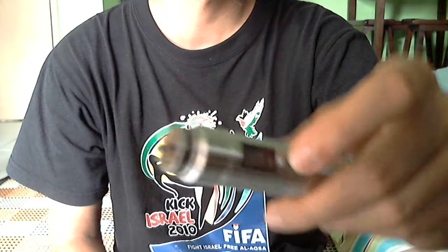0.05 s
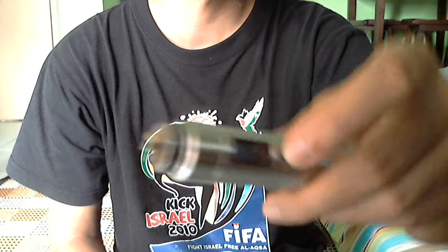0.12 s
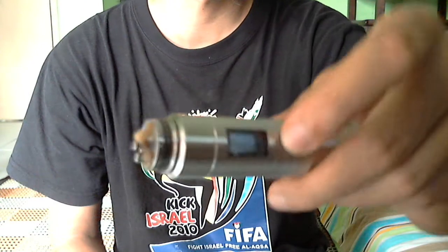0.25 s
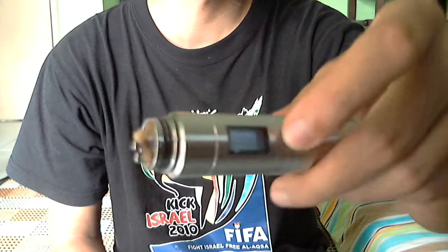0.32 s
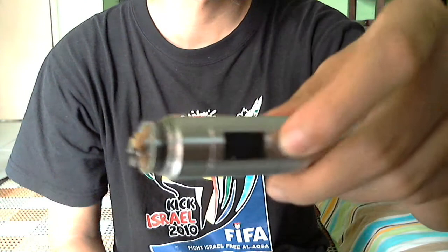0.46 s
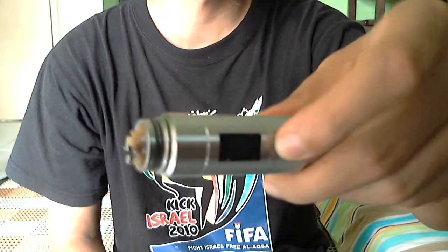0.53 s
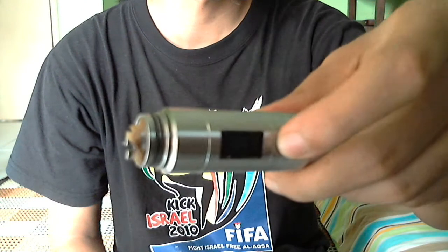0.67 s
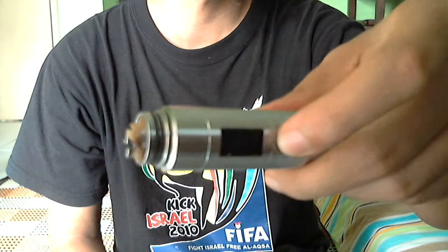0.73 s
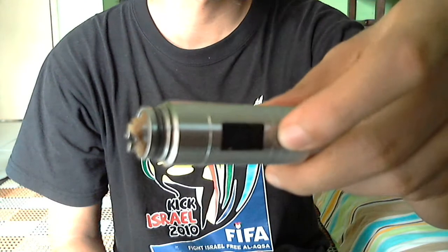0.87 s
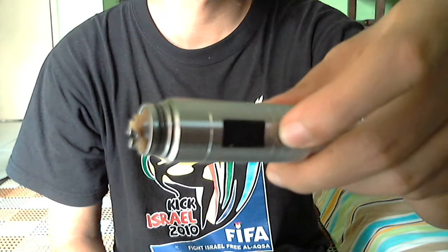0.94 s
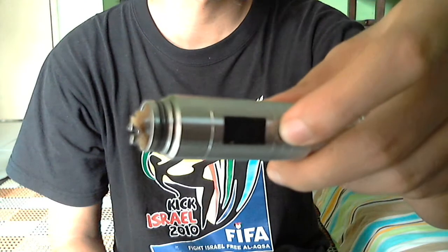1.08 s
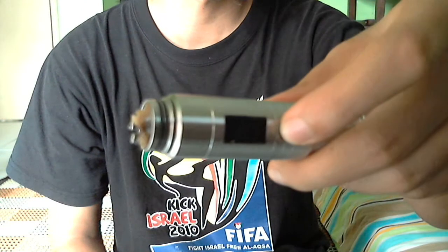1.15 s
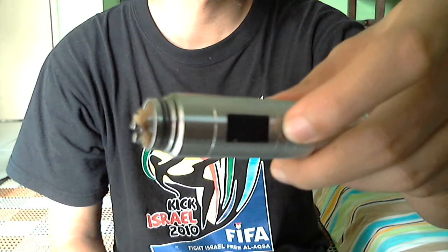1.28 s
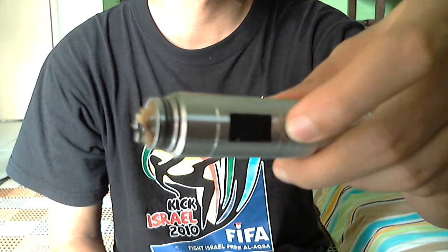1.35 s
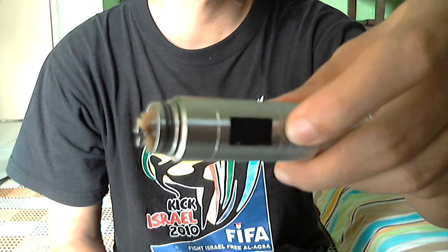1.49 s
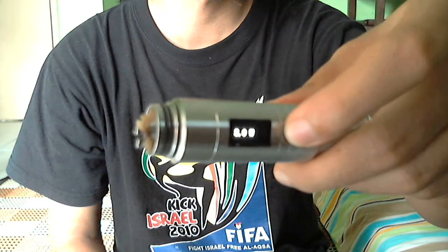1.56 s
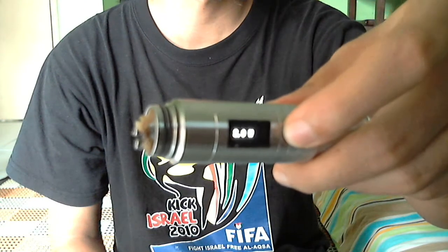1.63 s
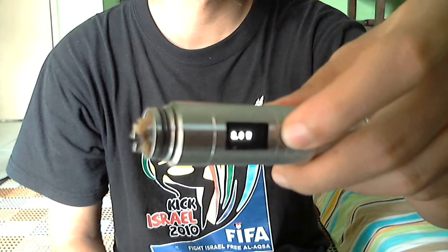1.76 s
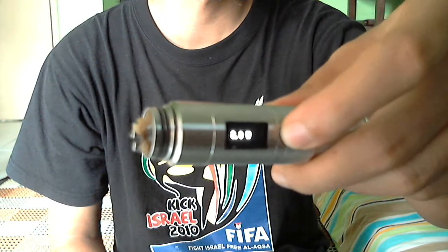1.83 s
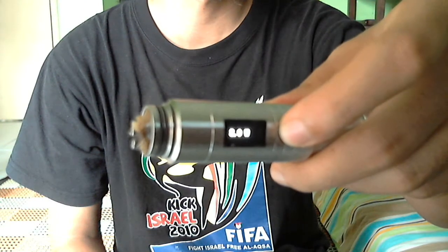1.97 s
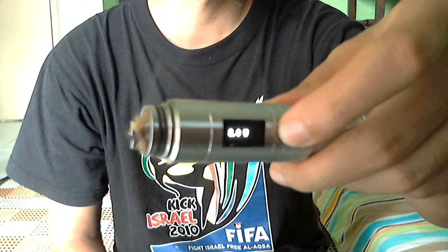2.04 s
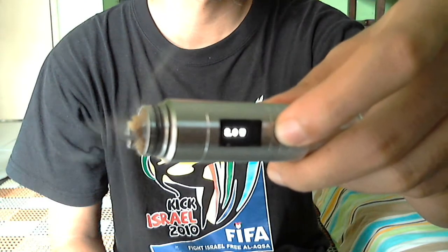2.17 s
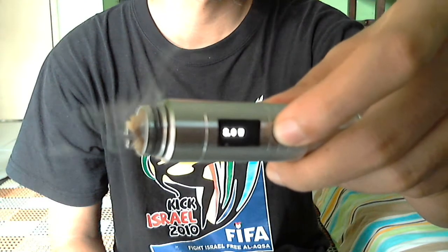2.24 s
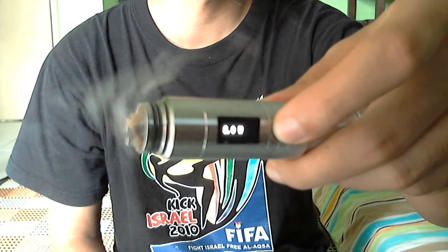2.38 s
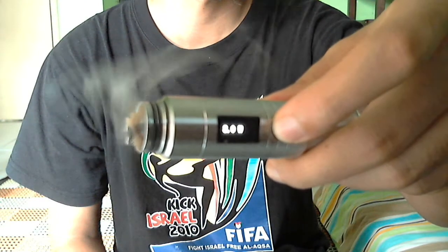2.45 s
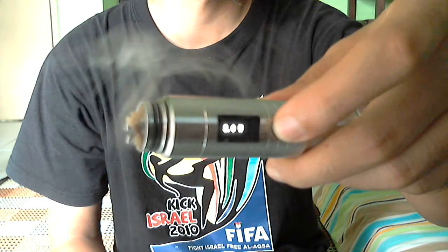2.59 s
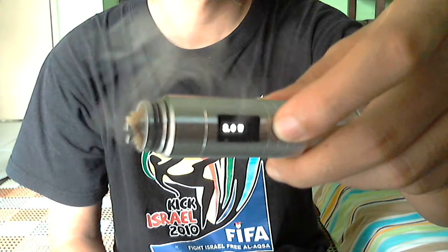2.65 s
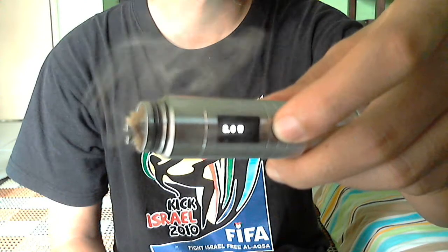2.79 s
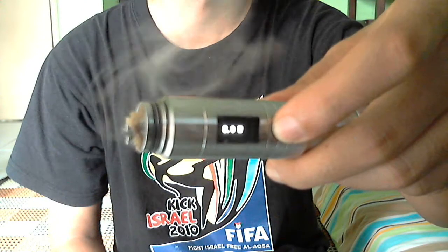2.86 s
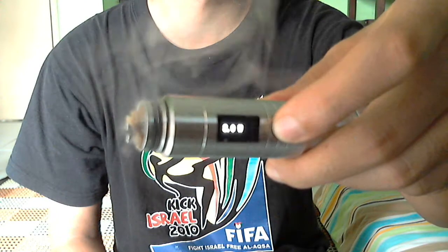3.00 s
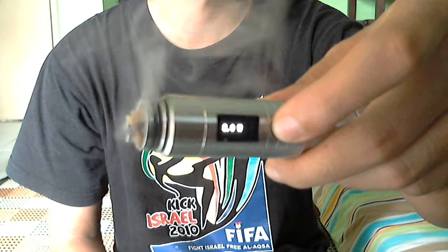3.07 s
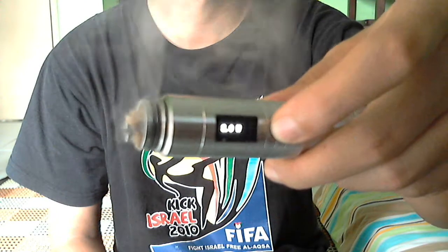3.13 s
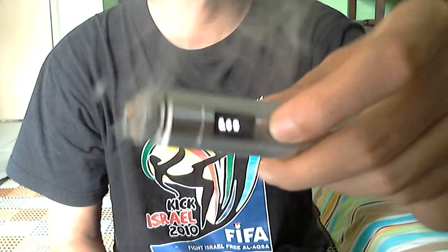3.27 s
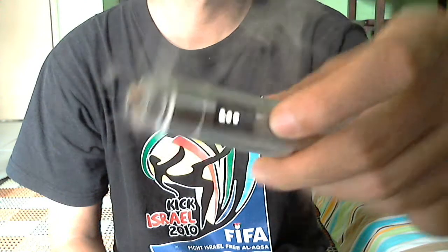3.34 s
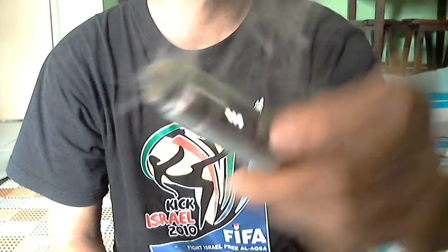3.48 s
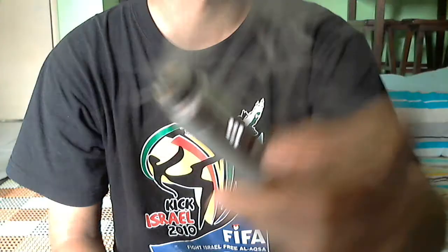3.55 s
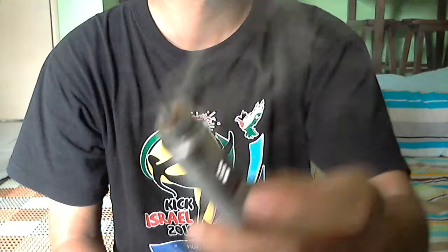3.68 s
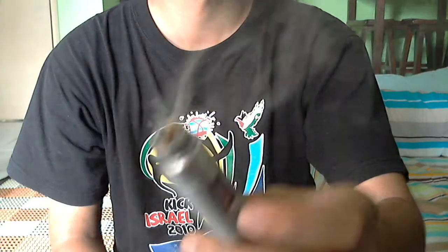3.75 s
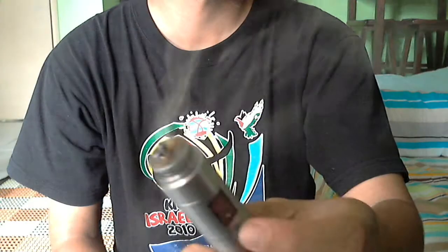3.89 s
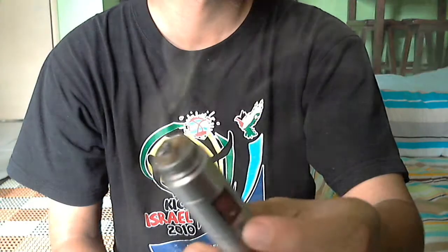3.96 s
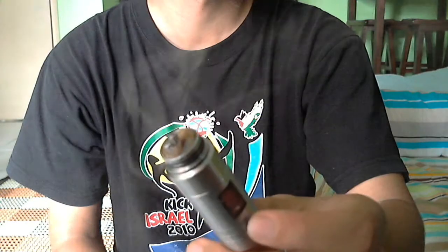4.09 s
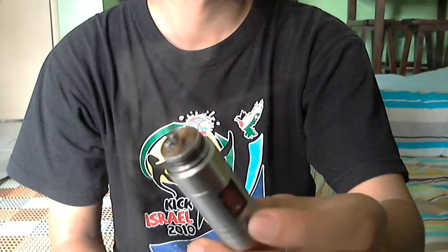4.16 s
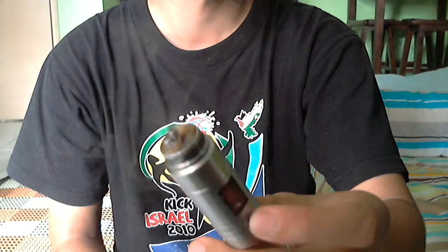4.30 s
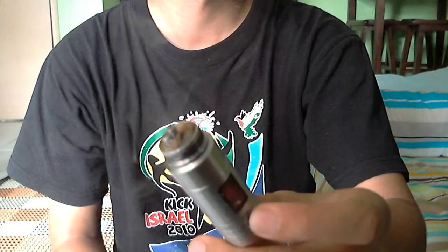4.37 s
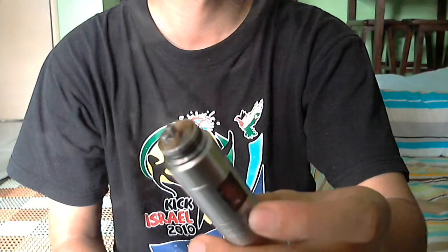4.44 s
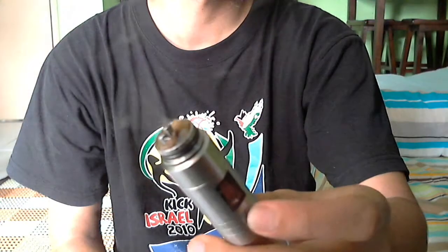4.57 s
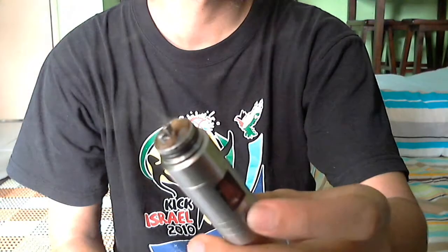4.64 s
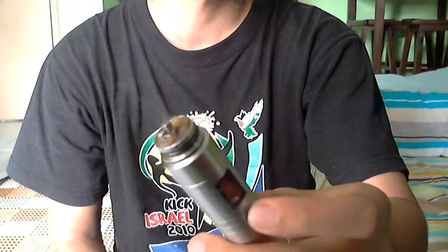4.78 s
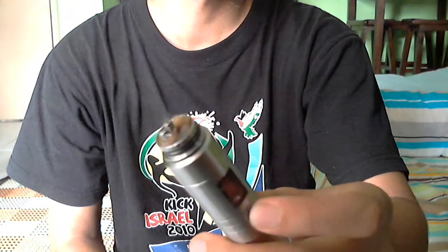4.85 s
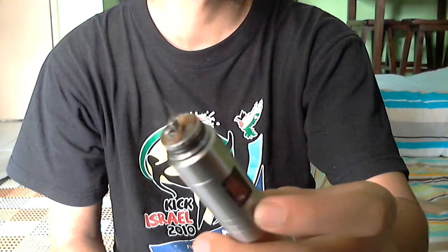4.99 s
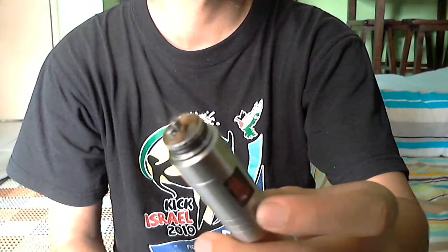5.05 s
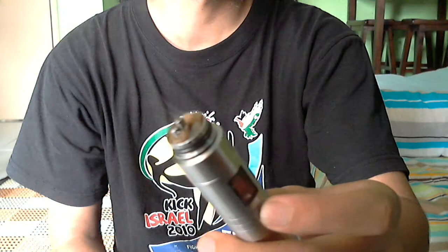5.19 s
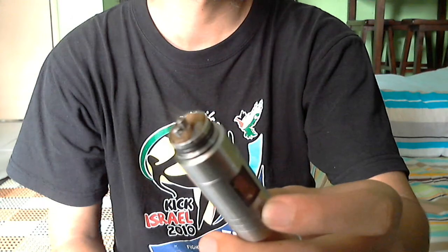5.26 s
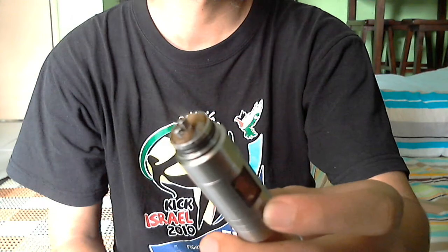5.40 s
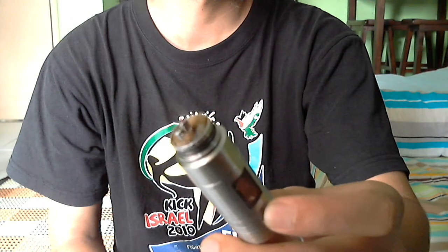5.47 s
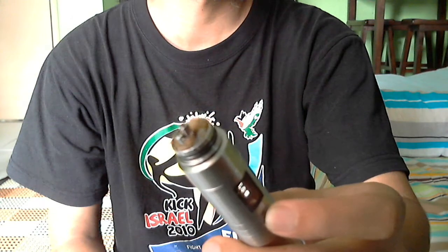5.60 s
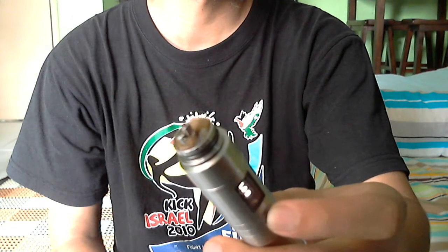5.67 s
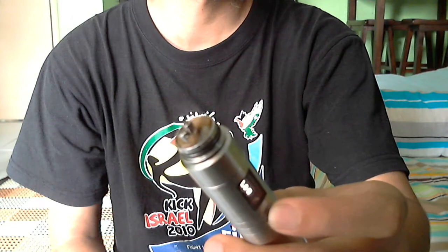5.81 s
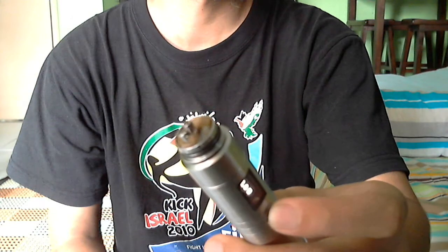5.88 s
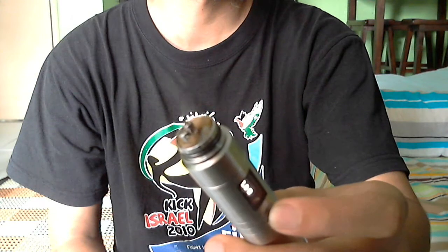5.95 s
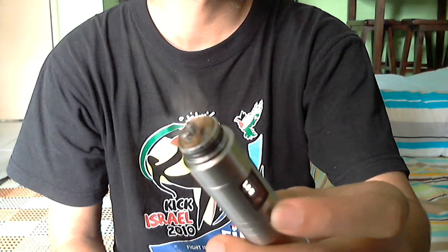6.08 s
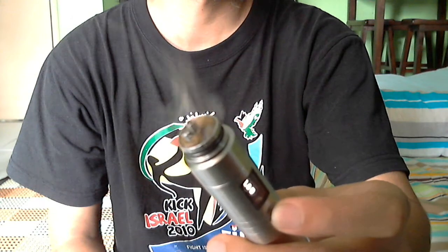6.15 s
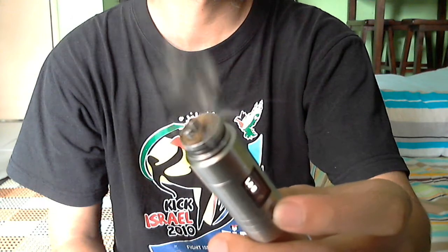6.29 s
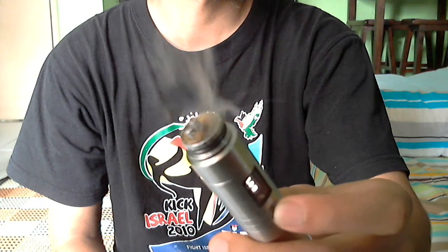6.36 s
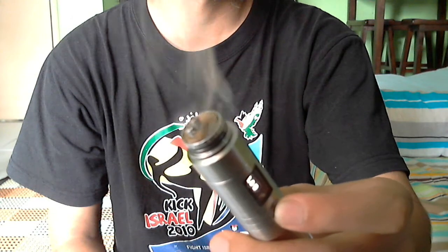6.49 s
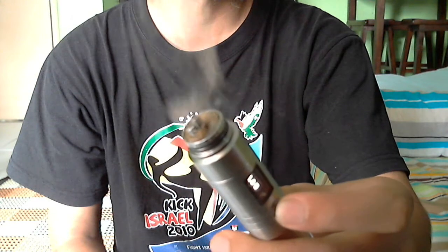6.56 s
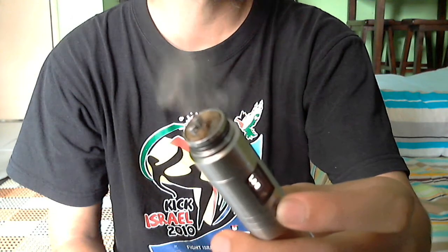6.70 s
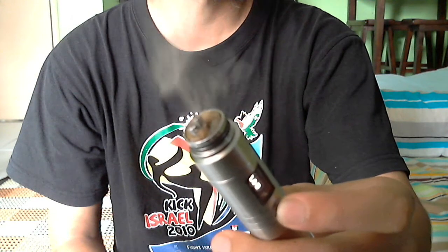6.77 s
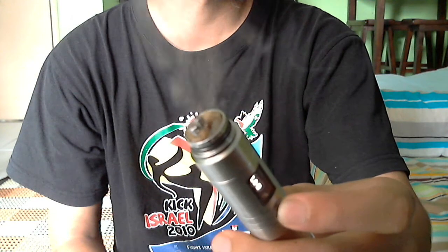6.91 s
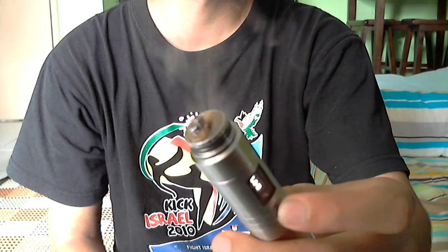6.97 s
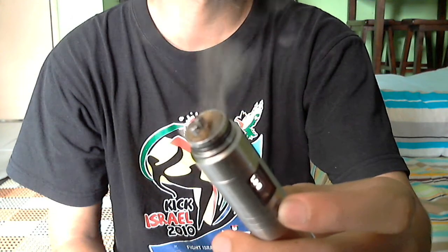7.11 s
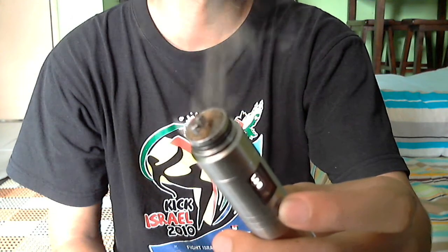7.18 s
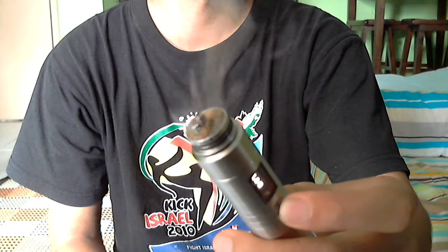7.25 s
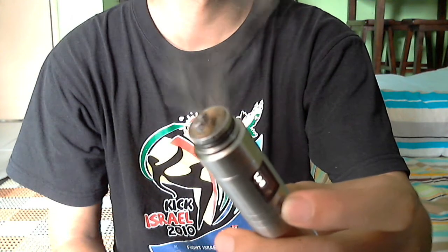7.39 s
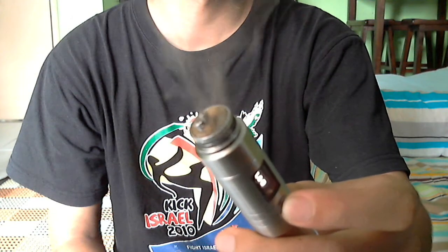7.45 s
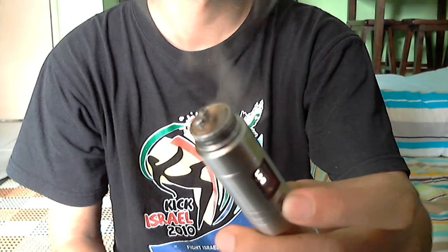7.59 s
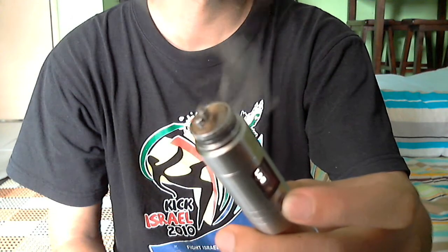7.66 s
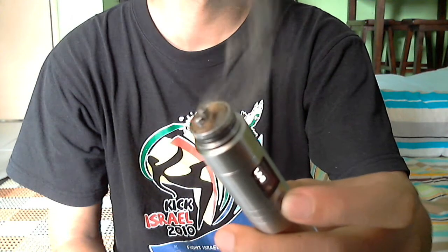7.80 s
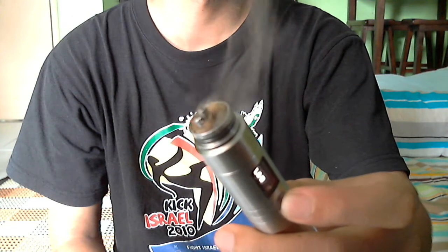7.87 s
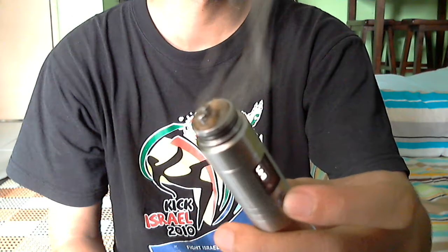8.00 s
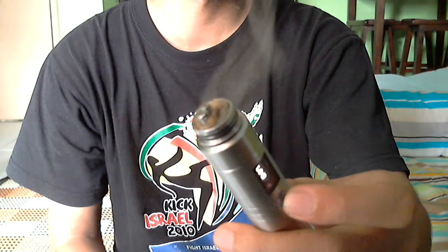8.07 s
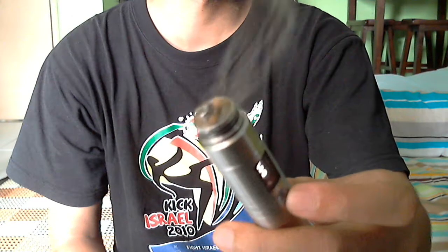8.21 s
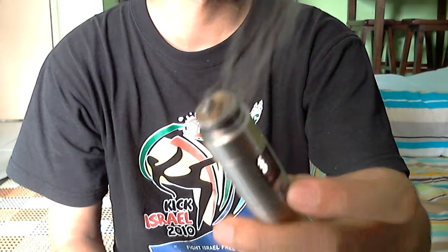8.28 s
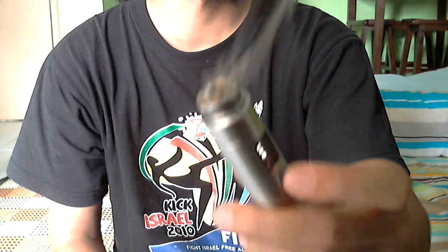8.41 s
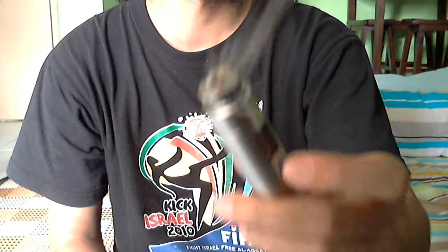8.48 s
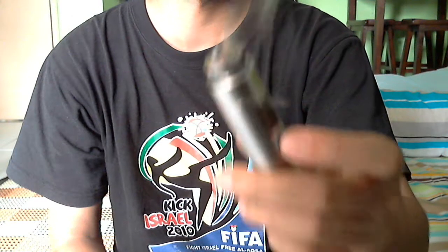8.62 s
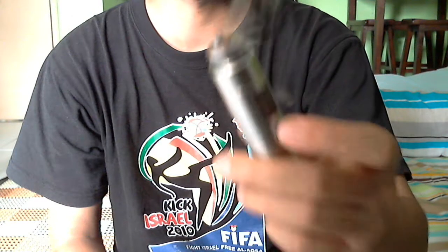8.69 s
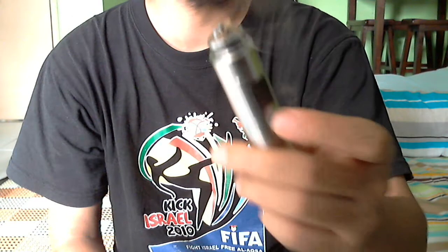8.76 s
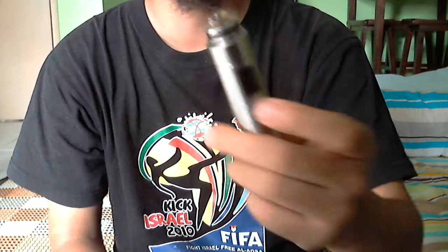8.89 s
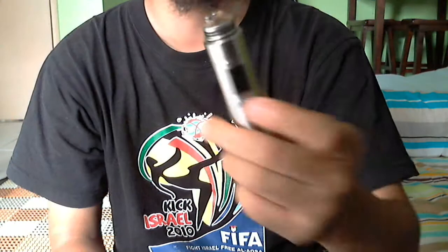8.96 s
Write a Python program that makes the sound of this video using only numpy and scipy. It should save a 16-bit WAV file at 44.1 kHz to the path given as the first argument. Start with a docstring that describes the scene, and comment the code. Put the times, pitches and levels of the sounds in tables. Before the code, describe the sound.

A small button clicks and a wet vaporizer coil fizzes, crackles and spits sharp pops close by, twice, in a quiet room with soft handling bumps.

```python
"""Low room noise and soft handling bumps are heard first; then a button clicks and a bare vaporizer coil,
close by in a quiet room, is fired, and later both happen again. The wet wick boils in a dense fizz of tiny
random bursts, spits loud pops and faint sputters, then simmers faintly until the power is cut. Shaped noise
makes the room, swelling low tones the bumps, struck modes the button, and impulses through resonances the
coil and knocks."""
import sys
import numpy as np
from scipy import signal
from scipy.fft import rfft, irfft
from scipy.io import wavfile

SR = 44100
rng = np.random.default_rng(int(sys.argv[2]) if len(sys.argv) > 2 else 0)


def unload_audio(sound):
    """Save the sound as a 16-bit wav file, at the path given as the first command line argument."""
    columns = np.transpose(np.atleast_2d(sound))
    # keep every value between -1 and 1, then stretch to whole-number steps
    steps = np.round(np.clip(columns, -1, 1) * 32767)
    wavfile.write(sys.argv[1], SR, steps.astype(np.int16))


N = 398663
TIME = np.arange(N) / SR
EDGE_HZ = 16600  # upper band limit

# Spectra give relative gain, except where a level is named.
# room noise: (frequency [Hz], relative density [dB])
ROOM_SPECTRUM = [(25, -43), (50, -32.5), (70, -20), (120, -14), (165, -7.5), (265, -7.5), (310, -2),
                 (450, -11.5), (700, -16), (920, -21.5), (1200, -21), (2500, -33), (2900, -32), (3400, -37),
                 (4800, -42), (7200, -44), (8500, -50), (16000, -53.5)]
ROOM_DB = -56  # rms of the air noise before its final trim
# steady hum and whine: (frequency [Hz], rms level before wavering [dB])
HUM_TONES = [(168.5, -71.5), (295.5, -68), (630, -80), (691, -79), (1025.5, -78.5), (1173, -82)]
# reflections from the room: (frequency [Hz], gain [dB])
WALL_SPECTRUM = [(500, 5.5), (1800, 12), (3500, 2), (6500, -3.5), (9000, 0), (13000, 0.5)]
# dull bounce off the walls: (frequency [Hz], gain [dB])
BOUNCE_SPECTRUM = [(300, -6), (1100, 2), (2300, 0), (3500, -11.5), (5000, -24), (9000, -26.5),
                   (16000, -29.5)]

# firmest soft bumps of the hand and body: (time [s], level before trim [dB], pitch [Hz])
HANDLING_BUMPS = [(0.054, -47, 314), (0.573, -45.5, 171), (0.668, -45.5, 352), (0.86, -47, 314),
                  (1.009, -46, 310), (1.063, -43, 309), (1.104, -43, 319), (1.207, -42, 348),
                  (1.978, -50, 157), (2.051, -48, 313), (2.133, -48, 174), (2.951, -46.5, 215),
                  (2.994, -45.5, 179), (3.132, -45, 293), (3.189, -42.5, 314), (3.479, -45.5, 291),
                  (3.542, -45, 303), (3.877, -44, 179), (3.902, -45.5, 304), (4.439, -47, 299),
                  (4.707, -45.5, 171), (4.874, -48, 177), (4.917, -45, 307), (5.337, -49, 501),
                  (5.695, -43.5, 208), (6.017, -47, 185), (6.235, -47, 185), (6.268, -41, 296),
                  (6.64, -43, 277), (7.251, -41.5, 325), (7.754, -44, 328), (7.85, -45, 289),
                  (7.937, -43, 312), (8.134, -39.5, 173), (8.292, -43.5, 302), (8.314, -44.5, 150),
                  (8.417, -45.5, 181), (8.607, -36.5, 308), (8.766, -45, 258.5), (8.853, -45.5, 205)]
# fainter random bumps: rate, level before trim, range of pitch
FIDGET_PER_S, FIDGET_DB, FIDGET_LOW_HZ, FIDGET_HIGH_HZ = 3, -51.5, 140, 367
# small knocks of the metal tube, and the low crack of the spit at 7.08 s:
# (time [s], strength [dB], crack [dB], strongest ring [Hz], ring [dB]), crack and ring relative to strength
KNOCKS_AND_CRACK = [(3.2711, -29, -2, 5580, 1), (7.0814, -35, 4, 2460, -7.5), (7.974, -34, 3, 2610, 6)]
# dull blow of a knock or crack: (frequency [Hz], gain [dB])
BLOW_SPECTRUM = [(200, -2), (700, -2), (1100, 0.5), (1700, -4), (2600, 3), (4700, 1), (6500, 10), (7600, 4),
                 (10000, -25.5), (16000, -63.5)]

# presses of the fire button: (time [s], level [dB])
BUTTON_PRESSES = [(1.4224, -16), (5.4997, -20)]
# resonances of the button: (frequency [Hz], level [dB], time to decay 60 dB [s])
BUTTON_RESONANCES = [(3620, 7, 0.01), (4455, -4, 0.008), (5520, 27, 0.0086), (6200, -13.5, 0.0091),
                     (7430, -14.5, 0.00399), (8400, -20, 0.0058)]
# dry snap of the switch spring: (frequency [Hz], gain [dB])
SWITCH_SPECTRUM = [(300, -35.5), (1000, -15.5), (1700, -17), (2800, -12.5), (4200, -1.5), (6500, 4.5),
                   (8200, -2.5), (9500, -13.5), (12000, -46), (16000, -50.5)]
# metal shimmer after the button: (frequency [Hz], gain [dB])
SHIMMER_SPECTRUM = [(500, -33), (2800, -28), (4200, -14), (5000, 0), (5600, 9), (6300, -1.5), (7000, -8),
                    (8000, -14.5), (9500, -35), (16000, -58)]
# wider rustle of the spring, which dies sooner: (frequency [Hz], gain [dB])
RUSTLE_SPECTRUM = [(500, -28.5), (3000, -18), (4200, -0.5), (5500, 2.5), (7000, 1), (8200, -6),
                   (9300, -19.5), (16000, -50.5)]

# firings of the coil: (power on [s], wick dry [s], power off [s], cooling time constant [s],
# boil [dB], sag [dB/s], body below 3.9 kHz [dB], top above 10.9 kHz [dB], simmer [dB],
# largest crackle above the boil [dB])
COIL_FIRINGS = [(1.856, 2.789, 3.745, .02, -40.5, 4.5, 1, 1, -62, 23),
                (5.825, 6.788, 8.45, 0.06, -40.5, 12.5, -4.5, -21.5, -64.5, 15.5)]
# fizz: (frequency [Hz], gain [dB])
FIZZ_SPECTRUM = [(500, -55), (2350, -34.5), (2950, -16.5), (4200, -5), (5400, -2), (6400, 2), (7300, 1.5),
                 (8400, -7), (9600, -15), (11500, -25.5), (14000, -34.5), (16000, -49.5)]
# simmer: (frequency [Hz], gain [dB])
SIMMER_SPECTRUM = [(800, -27), (2000, -10.5), (4200, -5), (5400, -1.5), (7400, 1), (8800, -10.5),
                   (11000, -24.5), (16000, -35.5)]
HEAT_S, RELEASE_S = 0.23, 0.013  # time constants: coil heating, boil collapsing
REFINE_S = 0.5  # time constant of the change from coarse boil to fine hiss
DRY_TOP_DB = -12  # change of the top by the time the wick is dry
# single droplets spitting off the coil, loud pops and faint sputters:
# (time [s], level [dB], body gain at 2.3 kHz [dB], top gain [dB], half of it applied at 10.5 kHz)
DROPLET_SPITS = [(1.8422, -44, -12, -21), (1.87, -33.5, -13, -15.0), (1.9032, -25, -16.0, -7),
                 (2.0142, -23.0, -1.0, -5.0), (2.0346, -21.5, -3.0, -1.0), (2.0461, -23.0, -3, -5.0),
                 (2.0652, -27, -11.0, -7), (2.0767, -14.5, 3.5, -10), (2.0977, -24, 0.0, -5.0),
                 (2.1102, -21, 0.0, -5.0), (2.1166, -13.5, -0.5, 0.0), (2.1377, -10, 4, -1),
                 (2.1557, -19, 0.0, -5.0), (2.1637, -22.0, -8, -5.0), (2.1768, -20.5, 5, -6),
                 (2.1866, -22.0, -3, -5.0), (2.196, -28, 0.5, -5.0), (2.2129, -31, -7, -5.0),
                 (2.2247, -3, -0.5, -3), (2.246, -23, 2.0, -5.0), (2.2639, -14.0, 11, -11),
                 (2.313, -12, -4, -3), (2.343, 2.0, 1.5, 0.0), (2.375, -26, -7, -5.0), (2.468, -15, 0, 1),
                 (2.4706, -17, -1.5, -3), (2.526, -12.0, -2.5, -1.0), (2.5545, -23, -2, -5.0),
                 (2.6003, -20, -4.0, -5.0), (2.6299, -20.5, -12.0, -3.0), (2.766, -20.0, -6.0, -15),
                 (2.7853, -25.0, -6, -14.0), (2.909, -24, 4, 0.0), (2.913, -3.0, 1, -4),
                 (3.0012, -5.0, -7, 0), (3.0275, -1, 7.5, -3), (3.2167, -3.0, 0.0, 0),
                 (3.3857, -24, 1.0, -6), (3.3899, -22.5, 4.0, -7), (5.841, -36.0, -13, -11.5),
                 (5.8848, -28.5, -17, -15.0), (5.897, -36, -18, -12), (6.0164, -12.5, -4, -8),
                 (6.051, -7.5, 0.0, -5.0), (6.1044, -20, -4, -1), (6.1381, -17.5, -3, -14.0),
                 (6.2017, -23.5, -9, -11.0), (6.2569, -4.0, 1.0, -3.0), (6.345, -29, -6.0, -15.0),
                 (6.4322, -10.5, -8, -1), (6.4531, -16, -2, 2.0), (6.525, -11, -3.0, -12.0),
                 (6.997, -16.5, 7.0, -7.0), (6.9996, -6.5, 2.5, 4), (7.0808, -20, -64, 23),
                 (7.2714, -27, 2, 0), (7.8381, -32.5, 21, -16), (7.852, -40.0, 13, -10.0),
                 (7.8556, -38.0, 14, -16)]
# one bursting droplet: (frequency [Hz], gain [dB])
BURST_SPECTRUM = [(300, -51.5), (1200, -35), (1800, -30.5), (2700, -15.5), (4600, -7.5), (6300, -1),
                  (7300, 0.5), (8300, -6.5), (9500, -15.5), (12000, -26.5), (16000, -41.5)]
# splutter after a pop: rate, duration, level after a 0 dB pop
SPLUTTER_PER_S, SPLUTTER_S, SPLUTTER_DB = 160, 0.031, -25.5
SPLUTTER_FOLLOW = .55  # dB of splutter lost per dB of a weaker pop
# small pops within the boil: rate, range of sizes, spread of body gain
CRACKLE_PER_S, CRACKLE_RANGE_DB, CRACKLE_BODY_DB = 130, 9.5, 4.5
CRACKLE_FADE_DB_PER_S = 9  # the crackle shrinks as the big drops are used up
# two bubbles that ring almost together as they burst: (time [s], level [dB], pitch [Hz])
BUBBLE_PINGS = [(2.468, -29, 2910), (2.4708, -39, 2420)]
# resonances of the metal deck that holds the coil: (frequency [Hz], gain [dB])
DECK_RESONANCES = [(2100, 1), (2450, 1.5), (2750, -3.5), (3150, 1.5), (3700, -1.5), (4250, 3.5), (4580, -5),
                   (5000, 0.5), (5450, 1), (5750, -2), (6400, 1.5), (6950, -1), (7350, 1), (7850, -1),
                   (8350, 1), (9100, -0.5), (10400, 1), (16000, 0.5)]
# near surfaces that echo the coil: (delay [s], level [dB])
NEAR_ECHOES = [(.00093, -24.5), (.00136, -25.5), (.00185, -26.5), (.0034, -21)]


def amp(db):
    """Amplitude ratio from decibels."""
    return 10 ** (np.asarray(db) / 20)


def unit(x):
    """Normalization to an rms of 1."""
    return x / np.sqrt(np.mean(x ** 2) + 1e-20)


def read(points, hz):
    """Interpolation of a spectrum on a logarithmic frequency axis."""
    f, value = np.transpose(points)
    return np.interp(np.log(hz + 1), np.log(f + 1), value)


def add(mix, s, sound):
    """Linear superposition of a sound from time s onward, in place."""
    part = mix[round(s * SR):][:len(sound)]
    part += sound[:len(part)]


def ring(x, response):
    """Convolution: a linear system's output for the source x."""
    return signal.oaconvolve(x, response)[:N]


def filtered(x, order, hz, kind="lowpass"):
    """Causal Butterworth filtering."""
    return signal.sosfilt(signal.butter(order, hz, kind, fs=SR, output="sos"), x)


def filtered_in_phase(x, order, hz, kind="lowpass"):
    """Butterworth filtering both ways in time, which cancels the phase shift."""
    return signal.sosfiltfilt(signal.butter(order, hz, kind, fs=SR, output="sos"), x)


def drift(rate):
    """Random process of rms 1, band-limited to vary up to about rate times a second."""
    hz = np.fft.rfftfreq(N, 1 / SR)
    spectrum = rfft(rng.standard_normal(N)) * np.exp(-(hz / rate) ** 2)
    return unit(irfft(spectrum, N))


def chance_times(per_s, start, end):
    """Poisson-like process: random moments between start and end, about per_s a second."""
    happens = rng.random(N) < per_s / SR
    return TIME[happens & (TIME > start) & (TIME < end)]


def snap(*spectra, size=2048):
    """Minimum-phase impulse response of the spectra in series, with an envelope peak of 1."""
    hz = abs(np.fft.fftfreq(size, 1 / SR))
    log_gain = np.log(amp(sum(read(points, hz) for points in spectra)))
    # the Hilbert transform of the log gain supplies the minimum phase
    click = np.fft.ifft(np.exp(signal.hilbert(log_gain).conj())).real[:size // 2]
    return click / abs(signal.hilbert(click)).max()


def colored_noise(length, spectrum):
    """Source-filter principle: white noise through the response of a spectrum."""
    return ring(rng.standard_normal(length), snap(spectrum))[:length]


def tone(hz, db, t60, rise_s=0.0015):
    """Damped resonance: one short ring that swells quickly and decays exponentially."""
    t = np.arange(SR // 20) / SR
    return amp(db - 60 * t / t60) * np.sin(2 * np.pi * hz * t) * (1 - np.exp(-t / rise_s))


def surroundings(early_db, early_s, late_db, late_t60, bounce_db, bounce_s=0.01, bounce_width_s=.007):
    """Room impulse response: direct sound, early reflections, a dull wall bounce and a decaying tail."""
    t = np.arange(SR // 3) / SR
    spectra = (WALL_SPECTRUM, WALL_SPECTRUM, BOUNCE_SPECTRUM)
    early, late, bounce = (colored_noise(len(t), spectrum) * (t > .001) for spectrum in spectra)
    early *= np.exp(-(t / early_s) ** 6) / np.sqrt(1 + t / 0.003236)
    late *= amp(-60 * t / late_t60)
    bounce *= np.exp(-((t - bounce_s) / bounce_width_s) ** 2)
    response = (t == 0).astype(float)
    for db, part in [(early_db, early), (late_db, late), (bounce_db, bounce)]:
        response += amp(db) * part / np.linalg.norm(part)
    return response


def room(lumps_db=2, low_db=-0.5, waver_db=2):
    """Stationary noise and modulation: steady air whose low end comes in lumps, with a wavering hum."""
    air = amp(ROOM_DB) * unit(ring(rng.standard_normal(N), snap(ROOM_SPECTRUM, size=8192)))
    low = filtered_in_phase(air, 4, 420)
    lumps = amp(low_db) * unit(amp(lumps_db * drift(33.5)))
    hum = np.zeros(N)
    for hz, db in HUM_TONES:
        level = amp(db + waver_db * drift(6.8)) * np.sqrt(2)  # rms to peak
        hum += level * np.sin(2 * np.pi * hz * TIME + drift(4.4))
    return amp(-1) * (air + (lumps - 1) * low) + hum


def handling(level_db=-2.0, width_hz=14, rise_s=0.0089):
    """Resonance broadened by phase diffusion: each soft push swells and dies in one low tone."""
    t = np.arange(SR // 5) / SR
    pitches = rng.uniform(FIDGET_LOW_HZ, FIDGET_HIGH_HZ, 100)
    times = chance_times(FIDGET_PER_S, 0, N / SR)
    fidgets = [(s, FIDGET_DB, hz) for s, hz in zip(times, pitches)]
    out = np.zeros(N)
    push = t / rise_s * np.exp(1 - t / rise_s)
    for s, db, hz in HANDLING_BUMPS + fidgets:
        wander = np.cumsum(rng.standard_normal(len(t))) * np.sqrt(2 * np.pi * width_hz / SR)
        bump = filtered(push * np.sin(2 * np.pi * hz * t + wander), 2, [90, 620], "bandpass")
        add(out, s, amp(db + level_db) * bump)
    return out


def knocks_and_crack(ring_t60=0.0054, scuff_db=-4, scuff_t60=0.03):
    """Impact excitation: tube knocks and one spit's low crack, each a blow, a scuff and a ring in the room."""
    t = np.arange(SR // 40) / SR
    out = np.zeros(N)
    for s, db, crack_db, ring_hz, ring_db in KNOCKS_AND_CRACK:
        scuff = rng.standard_normal(len(t)) * amp(-60 * t / scuff_t60)
        blow = (t == 0) + amp(scuff_db) * scuff / np.linalg.norm(scuff)
        add(out, s, amp(db + crack_db) * signal.convolve(blow, snap(BLOW_SPECTRUM)))
        add(out, s, tone(ring_hz, db + ring_db, ring_t60))
    return ring(out, surroundings(early_db=-5.0, early_s=0.015, late_db=-12, late_t60=0.24, bounce_db=-13.0))


def button_click(t, seat_s=.00072, seat_db=-3, stop_s=0.0014, stop_db=-7,
                 snap_db=0, rebound_s=0.001535, rebound_db=-4):
    """Modal superposition: the switch snaps over, seats and hits its stop within 2 ms."""
    modes = sum(amp(db - 60 * t / t60) * np.sin(2 * np.pi * hz * t) for hz, db, t60 in BUTTON_RESONANCES)
    modes = filtered(modes, 3, [3400, 8400], "bandpass")
    click = np.zeros(len(t))
    add(click, 0, amp(snap_db) * snap(SWITCH_SPECTRUM))
    add(click, rebound_s, -amp(rebound_db) * snap(SWITCH_SPECTRUM))
    for delay, blow_db in [(0, -4), (seat_s, seat_db), (stop_s, stop_db)]:
        add(click, delay, amp(blow_db) * modes / abs(modes).max())
    return click


def button(shimmer_db=-20.0, shimmer_t60=0.45, rustle_db=-24, rustle_s=0.062):
    """Frequency-dependent damping: after each click a wide rustle dies before the narrower shimmer."""
    t = np.arange(SR // 5) / SR
    click = button_click(t)
    click_norm = np.linalg.norm(click)
    out = np.zeros(N)
    for s, db in BUTTON_PRESSES:
        shimmer = colored_noise(len(t), SHIMMER_SPECTRUM)
        shimmer *= amp(-60 * t / shimmer_t60) * np.exp(-(t / 0.14) ** 6)
        shimmer *= amp(shimmer_db) * click_norm / np.linalg.norm(shimmer)
        rustle = colored_noise(len(t), RUSTLE_SPECTRUM) * np.exp(-(t / rustle_s) ** 2)
        rustle *= amp(rustle_db) * click_norm / np.linalg.norm(rustle)
        add(out, s, amp(db) * (click + shimmer + rustle))
    return ring(out, surroundings(early_db=-18.5, early_s=0.048, late_db=-38.5, late_t60=0.17, bounce_db=-13.0))


def boil(s, on, dry, db, sag_db_per_s):
    """Thermal relaxation: the boil grows with heat, sags as liquid is used up and collapses when dry."""
    age = np.maximum(s - on, 0)
    heat = 1 - np.exp(-age / HEAT_S)
    collapse = np.exp(-np.maximum(s - dry, 0) / RELEASE_S)
    return amp(db - sag_db_per_s * age) * heat * collapse


def bubbles(spectrum, per_s, spread_db, clump_db, steam_db):
    """Shot noise of rms 1: tiny bursts of uneven size, clumped in time, over a hiss of steam."""
    sizes = amp(spread_db * np.minimum(rng.exponential(1, N), 4))
    happens = rng.random(N) < per_s / SR
    bursts = unit(sizes * happens * amp(clump_db * drift(55)))
    return unit(ring(bursts + amp(steam_db) * rng.standard_normal(N), snap(spectrum)))


def sizzle(dry_body_db=-7, cold_body_db=-12, warm_s=.12):
    """Boiling noise: thin when cold, then coarse, then finer and narrower as the wick dries, over a simmer."""
    coarse = bubbles(FIZZ_SPECTRUM, per_s=2100, spread_db=6.0, clump_db=4.5, steam_db=-11)
    fine = bubbles(FIZZ_SPECTRUM, per_s=3100, spread_db=3.5, clump_db=3.5, steam_db=-5.0)
    simmer = bubbles(SIMMER_SPECTRUM, per_s=1800, spread_db=4.0, clump_db=3.0, steam_db=-3.0)
    out = np.zeros(N)
    for on, dry, off, cooling_s, db, sag, body_db, top_db, simmer_db, _ in COIL_FIRINGS:
        age = np.maximum(TIME - on, 0)
        wet = np.exp(-age / REFINE_S)
        fizz = np.sqrt(wet) * coarse + np.sqrt(1 - wet) * fine  # equal-power crossfade
        top = filtered_in_phase(fizz, 6, 10900, "highpass")
        body = filtered_in_phase(fizz, 4, 3900)
        dryness = np.clip((TIME - on) / (dry - on), 0, 1) ** 5
        cold = np.exp(-age / warm_s)
        top_gain = amp(top_db + DRY_TOP_DB * dryness)
        body_gain = amp(body_db + dry_body_db * dryness + cold_body_db * cold)
        fizz = fizz + (top_gain - 1) * top + (body_gain - 1) * body
        out += boil(TIME, on, dry, db, sag) * fizz
        powered = (TIME > on) * np.exp(-np.maximum(TIME - off, 0) / cooling_s)
        out += amp(simmer_db) * simmer * powered
    return out


def droplet(body_db, top_db):
    """Impulsive source: one droplet flashes to steam, peak 1, with its own body and top."""
    tilt = [(2300, body_db), (7200, 0.00025), (10500, top_db / 2), (16000, min(top_db, 0))]
    return snap(BURST_SPECTRUM, tilt)


def crackle(low_cut_hz=2850):
    """Random impulses: small droplets burst with strength set by the boil and top set by the firing."""
    out = np.zeros(N)
    for on, dry, _, _, db, sag, _, top_db, _, crackle_db in COIL_FIRINGS:
        sizes, bodies = rng.random(400), rng.standard_normal(400)
        for s, size, body in zip(chance_times(CRACKLE_PER_S, on, dry), sizes, bodies):
            above_boil_db = crackle_db - CRACKLE_FADE_DB_PER_S * (s - on) - CRACKLE_RANGE_DB * size
            peak = boil(s, on, dry, db, sag) * amp(above_boil_db)
            add(out, s, peak * droplet(CRACKLE_BODY_DB * body, top_db - 4))
    return filtered(out, 4, low_cut_hz, "highpass")


def pings(t60=0.016):
    """Bubble resonance: two bubbles ring almost together, each at its own pitch."""
    out = np.zeros(N)
    for s, db, hz in BUBBLE_PINGS:
        add(out, s, tone(hz, db, t60))
    return out


def spits(flurry_db=-24.0, flurry_s=0.007, splutter_range_db=8):
    """Flash evaporation: trapped liquid fizzes briefly, bursts in one sharp pulse and splutters on."""
    out = np.zeros(N)
    for s, db, body_db, top_db in DROPLET_SPITS:
        flurry = rng.standard_normal(round(flurry_s * SR)) ** 3  # cubing makes it spiky
        flurry = signal.convolve(flurry / np.linalg.norm(flurry), amp(db) * snap(FIZZ_SPECTRUM))
        add(out, s - flurry_s, amp(flurry_db) * flurry)
        chance, size = rng.random((2, round(SPLUTTER_S * SR)))
        splutter = amp(SPLUTTER_DB + SPLUTTER_FOLLOW * db - splutter_range_db * size)
        bursts = (chance < SPLUTTER_PER_S / SR) * splutter
        bursts[0] = amp(db)  # the pop itself
        add(out, s, signal.convolve(bursts, droplet(body_db, top_db)))
    return out


def coil(low_cut_hz=400):
    """Common transfer path: fizz and spits leave the same spot and share its resonances and echoes."""
    direct = ring(spits() + pings() + crackle() + sizzle(), snap(DECK_RESONANCES))
    direct = filtered(direct, 2, low_cut_hz, "highpass")
    out = direct.copy()
    for delay, db in NEAR_ECHOES:
        add(out, delay, amp(db) * direct)
    return ring(out, surroundings(early_db=-17.0, early_s=0.026, late_db=-25.5, late_t60=0.22, bounce_db=-20.5))


def scene():
    """Superposition of the room, handling, knocks and crack, button and coil in one channel."""
    return (room() + handling() + knocks_and_crack() + button() + coil())[None]


def record(dry):
    """Band limitation: a linear-phase low-pass filter removes the highest treble."""
    low_pass = signal.firwin(511, EDGE_HZ, window=("kaiser", 9), fs=SR)
    return signal.oaconvolve(dry, low_pass[None], "same")


dry = scene()
out = record(dry)
unload_audio(out)
```